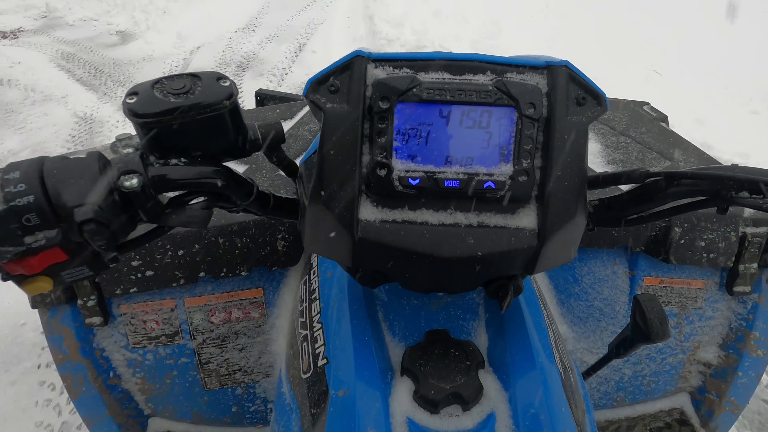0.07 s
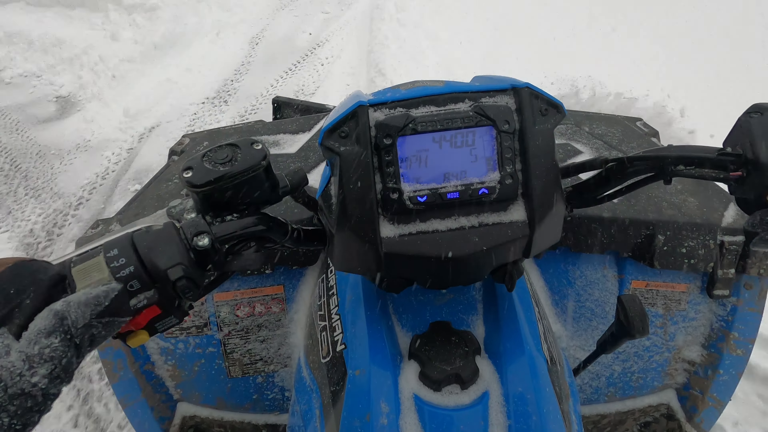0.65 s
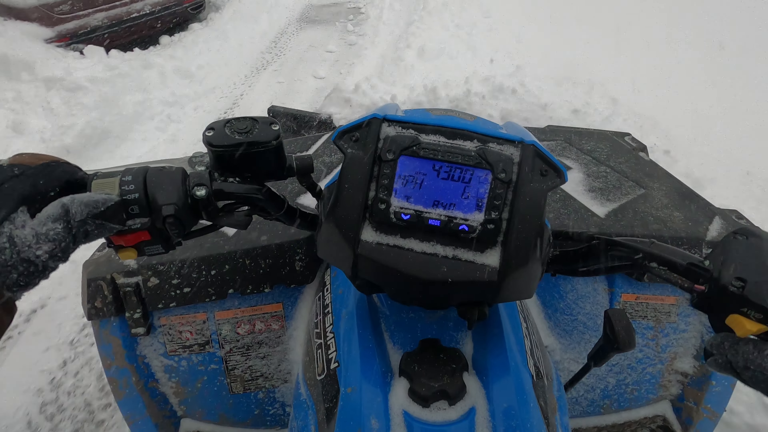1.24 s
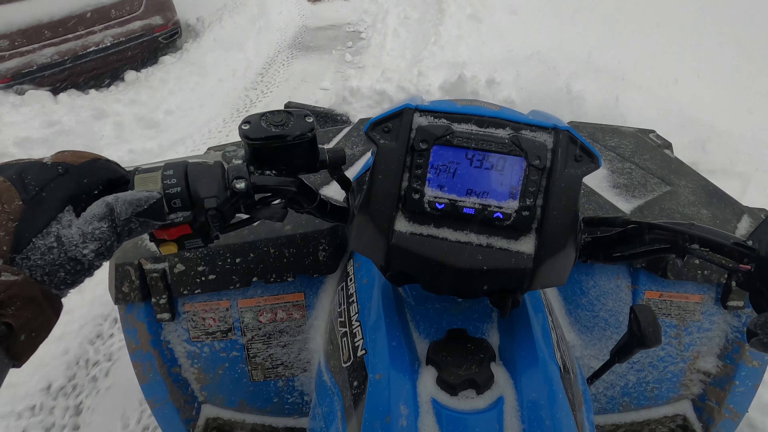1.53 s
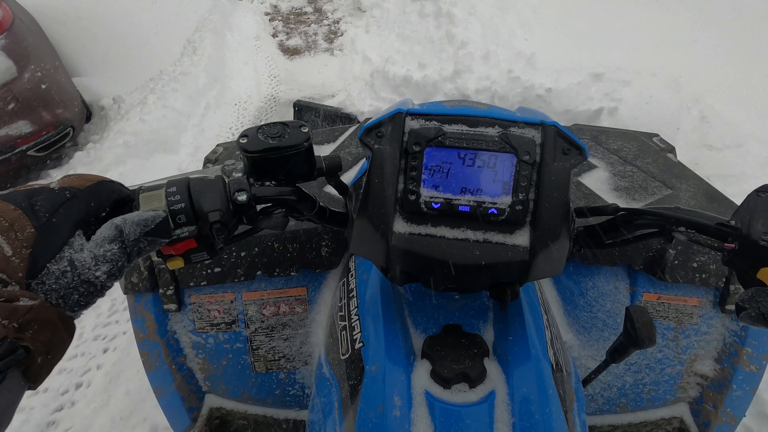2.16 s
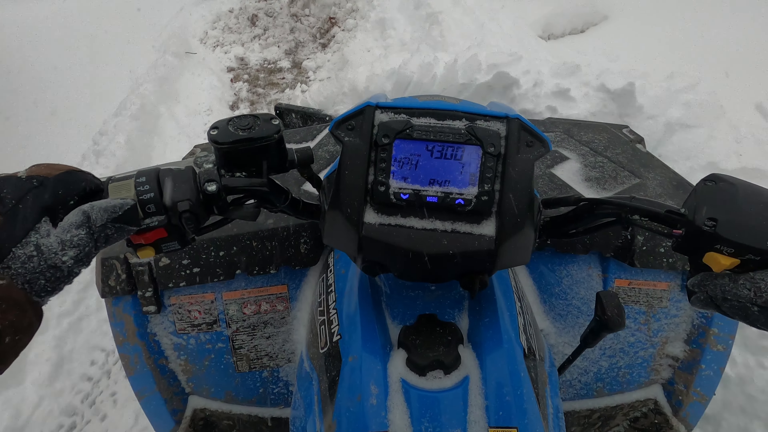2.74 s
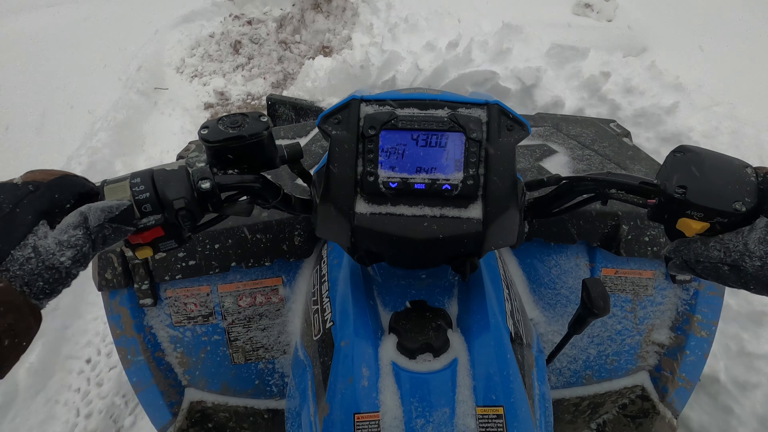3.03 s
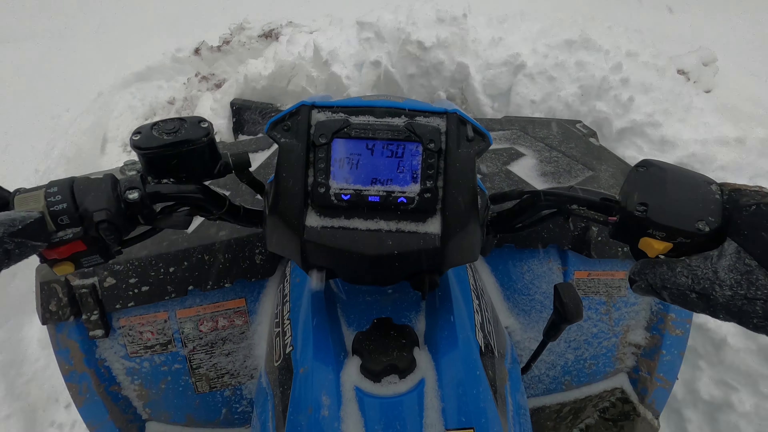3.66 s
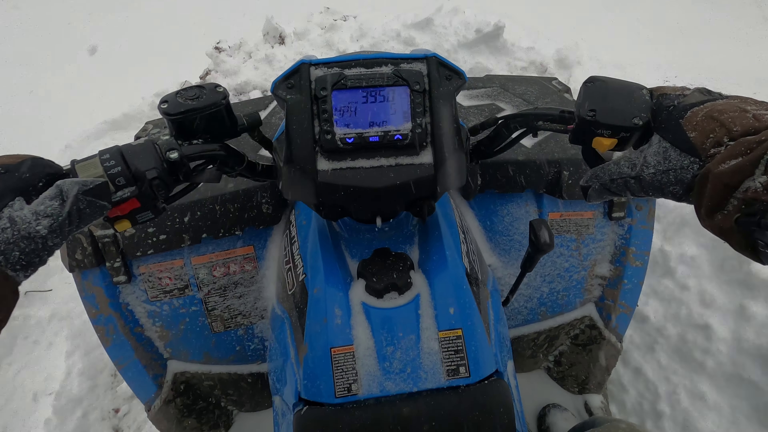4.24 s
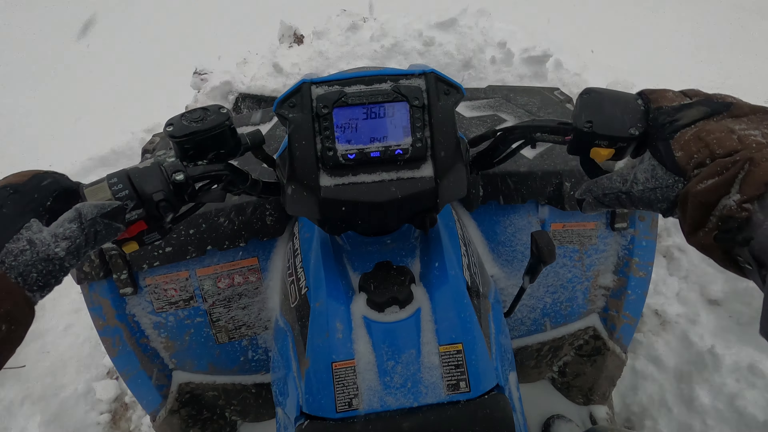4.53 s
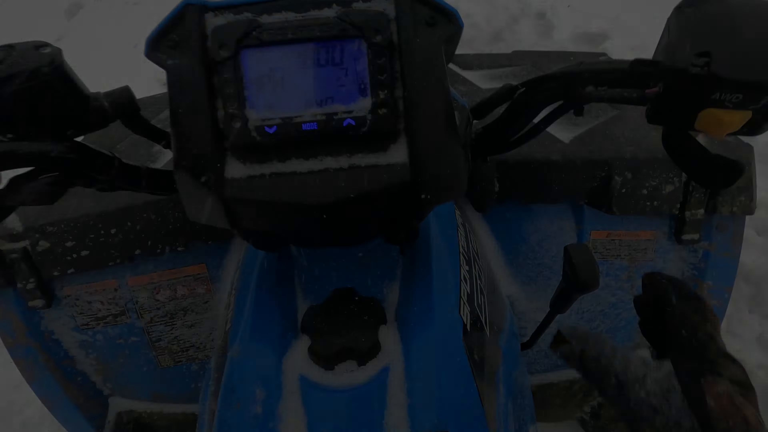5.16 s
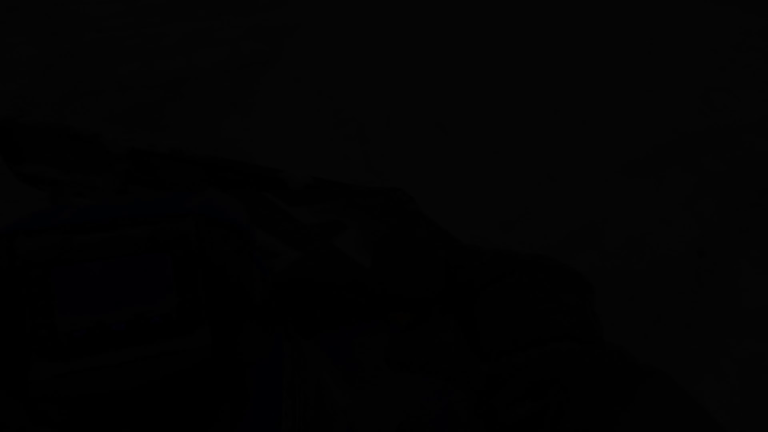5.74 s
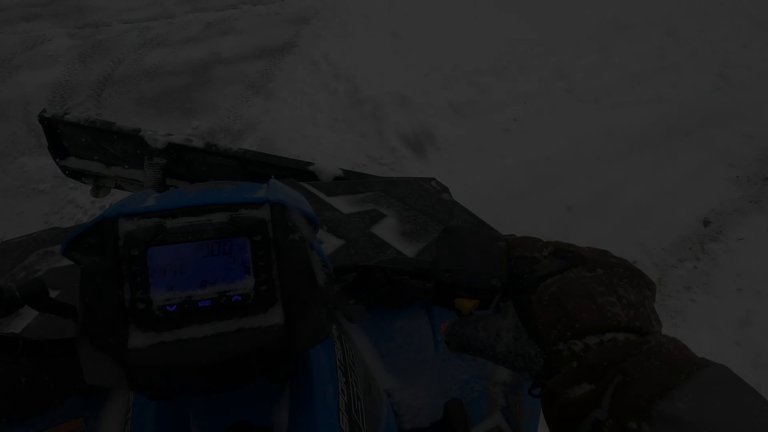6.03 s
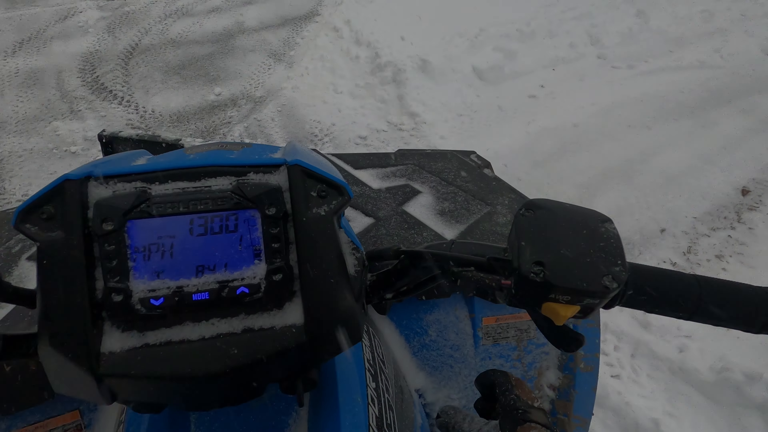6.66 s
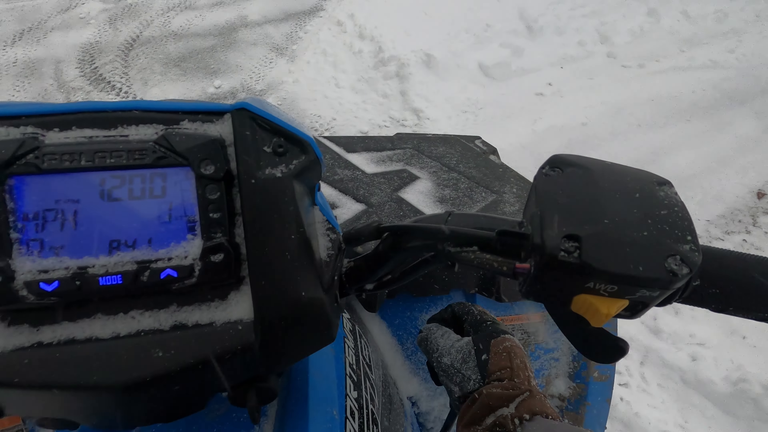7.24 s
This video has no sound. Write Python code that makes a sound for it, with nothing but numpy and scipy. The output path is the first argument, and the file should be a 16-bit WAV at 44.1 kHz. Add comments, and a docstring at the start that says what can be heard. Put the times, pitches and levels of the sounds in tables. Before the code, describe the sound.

A single-cylinder quad bike is heard close up from the rider's seat, outdoors, droning at high speed with valve clatter and gear whine. For the first three seconds its plow scrapes and judders through snow in repeated bites, while wind gusts, strongest around 2 seconds. A soft knock comes at 2.3 seconds and a metal clank at 2.6. The engine labours and sags slightly, and a belt squeal sinks in pitch from 3.3 to 4 seconds. At about 4.2 seconds the throttle shuts with a dull pop and the engine growls down to single thumps. The sound fades from 4.8 seconds to near silence at 5.8, then fades back in on a puttering idle. A winch whirrs from about 6.1 to 6.8 seconds, starting with a small clank. The plow lands with a loud double clank at 6.7, and a lighter knock follows at 7.1.

```python
"""On the rider's seat of a single-cylinder quad bike that pushes a snow plow through gusts of wind.
Periodic firings make a harmonic drone over valve clatter and gear whine; the blade scrapes by stick-slip
friction and the belt sings. The throttle shuts with a pop, and the engine growls down to single thumps.
The sound fades out and back in on the idling engine, and the winch lets the plow down with a clank."""
import sys
import numpy as np
from scipy import signal
from scipy.fft import rfft, irfft
from scipy.io import wavfile
from scipy.ndimage import uniform_filter1d

SR = 44100
rng = np.random.default_rng(int(sys.argv[2]) if len(sys.argv) > 2 else 0)


def store_wav(level_fs):
    """Save 16-bit WAV to argv[1]."""
    pcm = np.round(np.clip(np.atleast_2d(level_fs), -1, 1) * 32767)
    wavfile.write(sys.argv[1], SR, pcm.T.astype(np.int16))


N = 330750
TIME = np.arange(N) / SR
SHUT_S, IDLE_S = 4.234, 5.768  # the throttle shuts; the idle begins, at the bottom of the fade
COAST_HZ = 10.535  # firing rate towards which the engine runs down

# Spectrum of the machinery at speed. Each row: frequency in Hz, level in dB.
WHIRR_SPECTRUM = [(150, -3), (350, 1.5), (505, 3), (570, 0.5), (680, -1.5), (900, 0), (1005, 7), (1150, -2),
                  (1260, -4), (1365, 3.5), (1470, 0), (1640, 1), (1780, -1.5), (2000, -2.5), (2900, -6),
                  (4000, -14), (5500, -36), (12000, -55)]
# Spectrum of bright metallic hiss. Each row: frequency in Hz, level in dB.
HISS_SPECTRUM = [(2500, -21), (4200, 4.5), (5000, 1), (5800, -4), (6600, -3.5), (7700, -8), (8500, -18),
                 (10000, -14.5), (12500, -21.5), (15000, -36)]


def undb(db):
    """Decibels to amplitude ratio."""
    return 10 ** (np.asarray(db) / 20)


def unit(x):
    """Normalisation to rms 1."""
    return x / np.sqrt(np.mean(x ** 2))


def steady(x, size=13230):
    """Division by the running rms holds the slow level at 1 and keeps the pulses."""
    return x / np.sqrt(np.abs(uniform_filter1d(x ** 2, size)) + 1e-12)


def curve(rows):
    """Linear interpolation in time through (seconds, value) points."""
    return np.interp(TIME, *np.transpose(rows))


def walk(rate_hz):
    """Smoothed random fluctuation of rms 1."""
    hold = max(int(SR / rate_hz), 2)
    steps = np.repeat(rng.standard_normal(N // hold + 1), hold)
    return unit(uniform_filter1d(uniform_filter1d(steps, hold), hold)[:N])


def swell(start, length, attack, release):
    """Trapezoidal envelope from 0 to 1, with times in seconds."""
    return np.clip(np.minimum((TIME - start) / attack, (start + length - TIME) / release), 0, 1)


def after_shut(seconds, shape=2):
    """Relaxation from 1 towards 0 once the throttle shuts."""
    return np.exp(-(np.maximum(TIME - SHUT_S, 0) / seconds) ** shape)


def decay(t, t60):
    """Exponential damping by 60 dB in t60 seconds."""
    return np.exp(-np.log(1000) * t / t60)


def burst(t60, size=22050):
    """Exponentially damped noise."""
    return rng.standard_normal(size) * decay(TIME[:size], t60)


def response(spectrum, size=16384):
    """Minimum-phase impulse response of a (Hz, dB) spectrum, by folding the cepstrum."""
    hz, db = np.transpose(spectrum)
    grid = np.maximum(np.fft.rfftfreq(size, 1 / SR), 1)
    cepstrum = irfft(np.log(undb(np.interp(np.log(grid), np.log(hz), db))))
    cepstrum[1:size // 2] *= 2
    cepstrum[size // 2 + 1:] = 0
    return irfft(np.exp(rfft(cepstrum)))


def ring(x, body, lead=0):
    """Convolution with an impulse response that starts lead samples early."""
    return signal.fftconvolve(x, body)[lead:lead + N]


def strikes(crank, place, scatter_db):
    """Impulse train: one uneven blow whenever the engine passes this place (0-1) in its cycle."""
    at = np.flatnonzero(np.diff(np.floor(crank - place)) > 0)
    out = np.zeros(N)
    out[at] = undb(scatter_db * rng.standard_normal(len(at)))
    return out


def struck_modes(crank, place, modes, idling, rise_s, scatter_db=3.5, detune=0.014):
    """Damped modes excited once a cycle after the throttle shuts, varying in strength and pitch."""
    t, out = TIME[:SR // 5], np.zeros(N + SR)
    hits = np.flatnonzero(strikes(crank, place, 0) * (TIME > SHUT_S))
    for hz, t60, coast_db, idle_db in modes:
        envelope = decay(t, t60) * (1 - np.exp(-t / rise_s))
        for at, (strength, pitch) in zip(hits, rng.standard_normal((len(hits), 2))):
            db = coast_db + idling[at] * (idle_db - coast_db) + scatter_db * strength
            tone = np.cos(2 * np.pi * hz * (1 + detune * pitch) * t)
            out[at:at + len(t)] -= undb(db) * envelope * tone
    return out[:N]


def crankshaft(idling, shut_hz=32.6, shut_place=.746, idle_firing_s=6.8473):
    """Phase is the integral of frequency: gives the firing rate in Hz and the cycles turned."""
    # Engine speed while pushing and at idle. Each row: time in seconds, firing rate in Hz.
    push_speed = [(0.0, 36.11), (0.22, 36.85), (0.69, 35.59), (0.83, 35.64), (0.95, 36.38), (1.37, 36.57),
                  (1.55, 36.11), (2.67, 35.98), (3.42, 34.53), (3.57, 33.71), (3.94, 32.57), (4.22, 32.35)]
    idle_speed = [(5.8, 14.8), (5.98, 13), (6.09, 8.6), (6.2, 8.6), (6.3, 10.2), (6.4, 11), (6.5, 9.7),
                  (6.6, 10.02)]
    run_down = COAST_HZ + (shut_hz - COAST_HZ) * after_shut(.3763, shape=1.2156)
    hz = np.where(idling, curve(idle_speed), np.where(TIME < SHUT_S, curve(push_speed), run_down))
    hesitation = .07 * np.exp(-((TIME - 4.9) / .085) ** 2)  # one brief lag on the way down
    cycles = np.cumsum(hz) / SR - hesitation
    idle_origin = np.interp(idle_firing_s, TIME, cycles)
    push_origin = np.interp(SHUT_S, TIME, cycles) - shut_place
    return hz, cycles - np.where(idling, idle_origin, push_origin)


def drone(crank, strain, unrest, gain_db=-1.5, waver_db=1.15, rough=0.28, spread=7 * np.pi / 16):
    """Periodic exhaust pulses form a harmonic series; the pipe holds the low harmonics steadiest."""
    # Each row: harmonic number, relative level in dB running freely, the same when labouring.
    harmonics = [(1, -15.5, -17), (2, -31, -20), (3, -22.5, -22.5), (4, -11.5, -11.5), (5, -24.5, -23.5),
                 (6, -24.5, -30), (7, -28, -25.5), (8, -30.5, -30), (9, -33, -33.5), (10, -42.5, -28),
                 (11, -39.5, -31), (12, -43, -36.5), (13, -48.5, -50), (14, -38.5, -37.5), (15, -40, -37.5),
                 (16, -51, -42), (18, -60, -41)]
    out, uneven_db = 0, walk(36)
    for k, free_db, labour_db in harmonics:
        flutter_db = waver_db * min(k / 5, 2) * walk(13) + uneven_db * (k > 4)
        db = gain_db + free_db + strain * (labour_db - free_db) + unrest * flutter_db
        # dispersion in the silencer smears the low harmonics; the high ones arrive together as a bark
        phase = 2 * np.pi * k * crank - spread * min(k, 8) ** 2
        jitter = unrest * rough * (k / 10) * walk(40)
        out = out + undb(db) * (np.cos(phase) + jitter * np.sin(phase))
    return out


def rumble(crank, level_db=-33, pulsing=0.64, surge_db=2):
    """Uneven combustion makes low noise, amplitude-modulated at the firing rate."""
    # Each row: frequency in Hz, level in dB.
    spectrum = [(25, -16), (50, 0.5), (95, -2), (150, 3.5), (200, -3.5), (320, -11.5), (450, -21.5),
                (900, -44), (4000, -72)]
    throb = 1 + pulsing * np.cos(2 * np.pi * crank)
    gas = rng.standard_normal(N) * throb * undb(surge_db * walk(20))
    return undb(level_db) * unit(ring(gas, response(spectrum)))


def valve_timing(hz, fast_hz=19):
    """Valve and piston impacts are locked to the cycle, and fall later in it at speed."""
    # Each row: place in the cycle (0-1) when slow, place when fast, dB coasting, dB idling.
    impacts = [(.045, .18, -2, -5), (.375, .4, -20, -6), (.63, .66, -2, -10)]
    fast = np.clip((hz - COAST_HZ) / (fast_hz - COAST_HZ), 0, 1)
    return [(early + fast * (late - early), coast_db, idle_db)
            for early, late, coast_db, idle_db in impacts]


def clatter(crank, hz, idling, knock_db, t60, alike=0.64, repeat=0.31, rise_s=0.0011):
    """Valve impacts over the rush of chain and belt; each is part periodic, part random noise."""
    knocks, t = 0, TIME[:SR // 4]
    envelope = (1 - np.exp(-t / rise_s)) * decay(t, t60)
    for place, coast_db, idle_db in valve_timing(hz):
        taps = strikes(crank, place, scatter_db=0.7) * undb(coast_db + idling * (idle_db - coast_db))
        fresh = ring(taps, envelope) * rng.standard_normal(N)
        repeated = ring(taps, envelope * rng.standard_normal(len(t)))
        knocks = knocks + alike * repeated + (1 - alike) * fresh
    chain = steady(ring(strikes(crank, 0, scatter_db=2.5), burst(t60=0.39)))
    rush = repeat * chain + (1 - repeat) * rng.standard_normal(N)
    return undb(knock_db) * steady(knocks) + unit(rush * undb(1.1 * walk(150)))


def valve_cover(crank, hz, idling):
    """Impacts excite the modes of the cover; the valves land more softly as the engine slows."""
    # Each row: frequency in Hz, t60 in seconds, relative dB coasting, relative dB idling.
    modes = [(1411, 0.071, -4, -5), (2300, 0.03, -9.5, 1), (3200, 0.03, -11, -3.5), (4140, 0.022, -11, -9),
             (6420, 0.03, -23, -15.5), (7510, 0.035, -22, -29)]
    ticks = 0
    for place, coast_db, idle_db in valve_timing(hz):
        force = undb(coast_db + idling * (idle_db - coast_db))
        ticks = ticks + force * struck_modes(crank, place, modes, idling, rise_s=0.00099)
    softening_db = -3 * (0.5 - after_shut(0.76)) * (2 - idling)
    return ticks * undb(2 + softening_db)


def machinery(crank, hz, load, strain, shut, idling):
    """Structure-borne sound: the resonances of the engine case filter the clatter."""
    # Spectrum of the unloaded case. Each row: frequency in Hz, level in dB.
    case_spectrum = [(200, 19.5), (450, 4), (700, -0.5), (815, 2), (1000, 5), (1220, 0), (1450, 0),
                     (1950, -4.5), (2300, -4), (2700, -8), (3300, -6.5), (4200, -23), (5500, -46),
                     (12000, -59.5)]
    # Each engine state, in dB: body level, treble level, knocks over rush in the body, and in the treble.
    state_levels = {"free": (-29, -47.5, -7.5, -10), "labouring": (-32, -51.5, -8, -4.5),
                    "coasting": (-33, -55, -1, -1.5), "idling": (-30.5, -51.5, -3.5, -5)}
    shares = {"free": load * (1 - strain), "labouring": load * strain,
              "coasting": (1 - load) * (1 - idling), "idling": idling}
    levels = sum(np.outer(state_levels[state], share) for state, share in shares.items())
    body_db, treble_db, knock_db, tick_db = levels
    excitation = clatter(crank, hz, idling, knock_db, t60=0.031)
    loaded = unit(ring(excitation, response(WHIRR_SPECTRUM)))
    unloaded = unit(ring(excitation, response(case_spectrum)))
    body = steady(load * loaded + (1 - load) * unloaded)
    treble = steady(ring(clatter(crank, hz, idling, tick_db, t60=.032), response(HISS_SPECTRUM)))
    return (body + shut * valve_cover(crank, hz, idling)) * undb(body_db) + treble * undb(treble_db)


def gear_whine(crank, hz, wobble_rad=0.27, sway_cycles=.003, flutter_db=3):
    """Meshing teeth sing loudest at the case's resonances; play in the drive modulates their phase."""
    # Each row: multiple of the firing rate, level in dB before the case colours it.
    mesh_tones = [(27, -52.5), (28, -50.5), (30, -53.5), (38, -52.5), (42, -47), (43, -48.5), (44, -49),
                  (47, -51.5), (70, -52.5)]
    out, shaft = 0, crank + sway_cycles * walk(7)
    for k, db in mesh_tones:
        case_db = np.interp(k * hz, *np.transpose(WHIRR_SPECTRUM))
        level = undb(db + case_db + flutter_db * walk(7))
        out = out + level * np.sin(2 * np.pi * k * shaft + wobble_rad * walk(50))
    return out


def blade_scrape(slide_db=-27, grit_db=4, surge_db=1.5, wander=0.0707, flutter_db=2):
    """Stick-slip friction on snow; in each bite the blade judders and its edge grates on the ground."""
    # Spectra of the steel blade and of its grating edge. Each row: frequency in Hz, level in dB.
    blade_spectrum = [(25, -48), (60, -6), (120, 0.5), (160, 0), (210, 3), (260, -2), (340, -2.5),
                      (450, -14), (650, -21.5), (1000, -19), (1300, -25), (3000, -33), (8000, -60.5),
                      (16000, -72.5)]
    edge_spectrum = [(200, -20), (400, 7.5), (550, -5.5), (720, -1), (950, 1), (1200, -6), (1800, -19),
                     (3000, -29), (12000, -63)]
    # Each row: start and length in seconds, scrape and grating in dB, judder in Hz, judder in dB.
    bites = [(-.08, 0.44, -19.5, -27, 205, -22.5), (.2, .39, -18.8, -26.5, 255, -23),
             (0.628, 0.23, -22.5, -29, 290, -29.5), (1.066, 0.41, -23.5, -31.5, 269.7, -26.5),
             (1.872, 0.585, -24, -40, 253.8, -27.5), (2.615, 0.35, -24.5, -38, 264.5, -22)]
    jolts = rng.standard_normal(N) * undb(surge_db * walk(45))
    grit = rng.standard_normal(N) * undb(grit_db * walk(300))
    push = undb(slide_db) * after_shut(0.51)  # the sliding dies as the bike rolls out
    grate = judder = 0
    for start, length, scrape_db, grate_db, judder_hz, judder_db in bites:
        bite = swell(start, length, attack=0.061, release=0.16)
        push = np.hypot(push, bite * undb(scrape_db))
        grate = np.hypot(grate, bite * undb(grate_db))
        turns = np.cumsum(judder_hz * (1 + wander * walk(45))) / SR
        vibration = unit(np.sin(2 * np.pi * turns) * undb(flutter_db * walk(50)))
        judder = judder + bite * undb(judder_db) * vibration
    scraping = push * unit(ring(jolts, response(blade_spectrum)))
    grating = grate * unit(ring(grit, response(edge_spectrum)))
    return scraping + grating + judder


def wind(rise_share=0.58, flutter_db=4, apart=0.52, breeze_db=-47):
    """Turbulent pressure, partly coherent between the sides; gusts build more slowly than they drop."""
    # Each row: frequency in Hz, level in dB.
    spectrum = [(15, -9.5), (35, -8), (100, -6), (200, -14), (400, -15.5), (1000, -27), (3000, -49),
                (12000, -80.5)]
    # Each row: start in seconds, length in seconds, level in dB.
    gusts = [(0.396, 2.06, -30.5), (1.787, 0.66, -25.5), (5.6, 0.48, -51.5)]
    eddies = (rng.standard_normal(N) * undb(flutter_db * walk(11)) for _ in range(2))
    mid, difference = (unit(ring(noise, response(spectrum))) for noise in eddies)
    gusting = sum(undb(db) * swell(start, length, rise_share * length, (1 - rise_share) * length)
                  for start, length, db in gusts)
    side = apart * image_width() * difference
    return np.array([mid + side, mid - side]) * (gusting + undb(breeze_db))


def pop_and_knocks(rise_s=0.0036):
    """Damped low modes: a dull exhaust pop as the throttle shuts, and two soft low knocks."""
    # Each row: start in seconds, level in dB, lowest mode in Hz, t60 in seconds. The second is the pop.
    events = [(2.265, -15, 213, .1), (4.299, -17, 243.7, 0.14), (7.118, -22.5, 239, 0.11)]
    # Each row: multiple of the lowest mode, relative level in dB.
    modes = [(1, -2), (1.52, -5), (2.1, -13)]
    out, t = np.zeros(N + SR), TIME[:SR // 2]
    for start, db, lowest_hz, t60 in events:
        boom = sum(undb(mode_db) * np.sin(2 * np.pi * lowest_hz * ratio * t) for ratio, mode_db in modes)
        at = int(start * SR)
        out[at:at + len(t)] += undb(db) * boom * (1 - np.exp(-t / rise_s)) * decay(t, t60)
    return out[:N]


def plow_clanks():
    """Hard impacts rattle the linkage in a broad band and leave the blade in free vibration."""
    # Each row: start in seconds, level in dB, rattle t60 in seconds, relative snap and ring in dB.
    blows = [(2.628, -19.5, 0.27, -26, -5), (5.579, -37.5, 0.1, -15, -19),
             (6.063, -26.5, 0.068, -14.5, -13.5), (6.654, -16.5, 0.2, -16.5, -3),
             (6.676, -19.5, 0.33, -17, -1.5), (7.12, -25, 0.12, -13.5, -14)]
    # Each row: frequency in Hz, relative level in dB, t60 in seconds.
    blade_modes = [(111.7, -10, 0.23), (260, 2.5, 0.35), (408, -8.5, .36), (836, -16, .25),
                   (948, -13.5, 0.26), (1118, -6, 0.17), (2800, -17, 0.27), (3130, -19, .1)]
    # Each row: frequency in Hz, level in dB.
    crash_spectrum = [(60, 10), (220, 15), (450, 0.5), (700, -1.5), (1080, 5.5), (1250, -0.5), (1800, -9.5),
                      (2900, -8), (4500, -18.5), (7000, -22), (9000, -39), (13000, -64.5), (16000, -84)]
    out, crash, snap = np.zeros(N + SR), response(crash_spectrum), response(HISS_SPECTRUM)
    for start, db, t60, snap_db, ring_db in blows:
        colour = crash / np.linalg.norm(crash) + undb(snap_db) * snap / np.linalg.norm(snap)
        rattle = signal.fftconvolve(burst(t60), colour)
        t = TIME[:len(rattle)]
        blade = sum(undb(mode_db) * np.sin(2 * np.pi * hz * t) * decay(t, mode_t60)
                    for hz, mode_db, mode_t60 in blade_modes)
        at = int(start * SR)
        out[at:at + len(t)] += undb(db) * (rattle + undb(ring_db) * blade)
    return out[:N]


def belt_squeal(start_s=3.27, from_hz=1020, to_hz=694, sink_s=0.43, level_db=-36.5, flutter_db=2):
    """Friction sustains a rough tone that sinks as the bike slows."""
    sinking = np.exp(-(np.maximum(TIME - start_s, 0) / sink_s) ** 1.1)
    hz = (to_hz + (from_hz - to_hz) * sinking) * (1 + 0.0089 * walk(200))
    envelope = swell(start_s, length=0.72, attack=.13, release=0.27)
    rms = envelope * undb(level_db + flutter_db * walk(30.2))
    return np.sqrt(2) * rms * np.sin(2 * np.pi * np.cumsum(hz) / SR)


def pipe_growl(crank, hz, lag_s=0.009, waver_db=1):
    """Forced resonance: each falling harmonic swells as it slides through a mode of the pipe."""
    # Each row: centre in Hz, width in Hz, peak level in dB.
    resonances = [(114.7, 19, -11), (236, 16, -23.5), (353, 23, -29.5)]
    out = 0
    for k in range(1, 22):
        harmonic = 0
        for centre, width, db in resonances:
            offset_hz = k * hz - centre
            gain = undb(db) * np.exp(-(offset_hz / width) ** 2)
            harmonic = harmonic - gain * np.cos(2 * np.pi * (k * crank - offset_hz * lag_s))
        out = out + harmonic * undb(waver_db * walk(15))
    return out


def gulps(impulses, hz, width_s, late_s, drive):
    """Each impulse becomes a rounded swing of air pressure, saturated by the choked throttle."""
    t = TIME[:SR // 10] - 1 / 20 - late_s
    swing = np.cos(2 * np.pi * hz * t) * np.exp(-(t / width_s) ** 2 / 2)
    return ring(impulses, np.tanh(drive * swing), lead=SR // 20)


def thumps(crank, growling, idling, shallow_db=-4.5, settle_s=0.52, coast_db=-6.5, idle_db=-8):
    """Slow cycles are heard singly: gulps of air that deepen and leave airbox and pipe ringing."""
    # Each row: frequency in Hz, t60 in seconds, relative dB coasting, relative dB idling.
    airbox_modes = [(53.7, 0.095, -4, -2), (114.6, 0.2, -3, -8), (212, 0.091, -16, -20),
                    (260.6, 0.13, -20.5, -17.5), (296, 0.084, -11, -32), (334.5, 0.11, -18, -18.5),
                    (375.4, 0.065, -17.5, -21)]
    cycles = strikes(crank, 0, scatter_db=1.7)
    depth = (1 - idling) * undb(shallow_db * growling)
    coasting = -.65 * gulps(cycles * depth, hz=94.5, width_s=0.0067, late_s=0.0027, drive=1.58)
    firmness = np.clip((TIME - IDLE_S) / settle_s, 0, 1) ** 2
    firing = gulps(cycles * firmness, hz=84.2, width_s=0.0059, late_s=0.0049, drive=1.48)
    ringing = (1 - growling) * struck_modes(crank, 0, airbox_modes, firmness, rise_s=0.01)
    return (coasting + firing + ringing) * undb(np.where(idling, idle_db, coast_db))


def putter(crank, idling):
    """Soft exhaust puffs excite the cavity modes of the silencer between the idle's thumps."""
    # Each row: place in the cycle (0-1), level in dB.
    puffs = [(.385, -22.5), (.68, -26.5)]
    # Each row: frequency in Hz, t60 in seconds, relative level in dB.
    silencer = [(186, 0.048, -10), (249, 0.067, 0), (340, 0.06, -5.5)]
    modes = [(hz, t60, db, db) for hz, t60, db in silencer]
    return idling * sum(undb(db) * struck_modes(crank, place, modes, idling, rise_s=0.0037, detune=0.045)
                        for place, db in puffs)


def wavering_tones(tones, waver, waver_hz, flutter_hz, flutter_db=2):
    """Partials share one frequency modulation, and each flutters in level on its own."""
    turning = np.cumsum(1 + waver * walk(waver_hz)) / SR
    return sum(undb(db + flutter_db * walk(flutter_hz)) * np.sin(2 * np.pi * hz * turning)
               for hz, db in tones)


def pump():
    """Steady rotation makes a thin tonal whine, probably that of the fuel pump."""
    # Each row: frequency in Hz, level in dB.
    tones = [(2490, -61), (4975, -61)]
    return wavering_tones(tones, waver=0.00098, waver_hz=30, flutter_hz=15)


def winch(rush_db=-37, grain_db=2, tone_gain_db=1):
    """Meshing gears radiate tones over a broadband whirr while the plow comes down."""
    # The whirr's spectrum and the gear tones. Each row: frequency in Hz, relative level in dB.
    spectrum = [(120, -10), (250, -0.5), (450, -9), (750, -18.5), (1000, -3), (1200, -19), (1800, -11.5),
                (2600, -34), (3750, -21), (7000, -30.5), (10000, -58)]
    gear_tones = [(904.4, -48), (1346, -61), (1712, -61)]
    grains = rng.standard_normal(N) * undb(grain_db * walk(250))
    rush = undb(rush_db) * unit(ring(grains, response(spectrum)))
    singing = undb(tone_gain_db) * wavering_tones(gear_tones, waver=0.00417, waver_hz=25, flutter_hz=20)
    return (rush + singing) * swell(start=6.06, length=0.76, attack=0.04, release=0.11)


def image_width(idle_db=-0.5):
    """The side signal's gain sets the width: nearly mono late in the push, open again at idle."""
    # Each row: time in seconds, side gain in dB.
    opening = [(0, -3.5), (.7, 0), (2.35, 2), (2.65, -12), (3.2, -19.5), (4.2, -29.5)]
    return undb(np.where(TIME > IDLE_S, idle_db, curve(opening)))


def widen(mid, glancing, closed_hz=3000):
    """Sound glancing off the bodywork decorrelates the sides; as they close, bass goes mono first."""
    # Each row: frequency in Hz, side gain in dB with the image open.
    side_spectrum = [(60, -20.5), (150, -32.5), (300, -32.5), (700, -23), (1400, -16.5), (2800, -13),
                     (5000, -6), (10000, -3.5)]
    opening = image_width()
    broadband = ring(glancing, response(side_spectrum))
    treble = signal.sosfilt(signal.butter(4, closed_hz, "high", fs=SR, output="sos"), broadband)
    full = np.clip(2 * opening - .4, 0, 1)
    side = opening * (full * broadband + (1 - full) * treble)
    return np.array([mid + side, mid - side])


def scene(free_hz=36.25, labour_hz=34.2):
    """Superposition: the crank times the engine, the throttle sets its balance; plow and wind add in."""
    idling = 1. * (TIME > IDLE_S)
    hz, crank = crankshaft(idling)
    load = after_shut(0.15)
    shut = 1 - after_shut(0.053, shape=4.5)
    growling = after_shut(0.31, shape=2.9)
    strain = np.clip((free_hz - hz) / (free_hz - labour_hz), 0, 1)  # heavy snow slows the engine
    unrest = undb(-5 * strain)  # labouring steadies the combustion
    fade = np.interp(TIME, [4.78, IDLE_S, 6.76], [1, 0, 1])
    throttle_open = drone(crank, strain, unrest) + unrest * rumble(crank)
    throttle_shut = (growling * pipe_growl(crank, hz) + thumps(crank, growling, idling)
                     + putter(crank, idling))
    exhaust = (1 - shut) * throttle_open + shut * throttle_shut

    def bodywork():
        """Radiation from the metal parts, with fresh noise on each call."""
        engine = machinery(crank, hz, load, strain, shut, idling)
        whines = load * gear_whine(crank, hz) + idling * pump()
        return fade * (engine + whines + blade_scrape() + belt_squeal() + winch()) + plow_clanks()

    mid = fade * exhaust + pop_and_knocks() + bodywork()
    return widen(mid, glancing=bodywork()) + fade * wind()


def record(dry, top_hz=15100):
    """Soft saturation rounds the loudest peaks, and a steep low-pass cuts the top."""
    return signal.sosfilt(signal.ellip(8, .2, 70, top_hz, fs=SR, output="sos"), np.tanh(dry))


dry = scene()
out = record(dry)
store_wav(out)
```